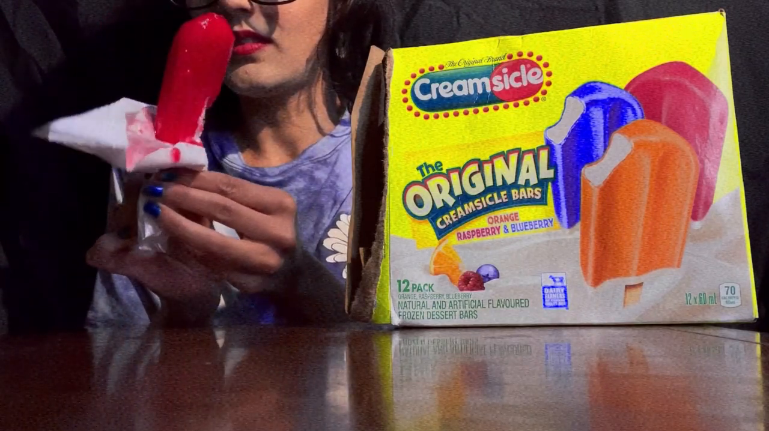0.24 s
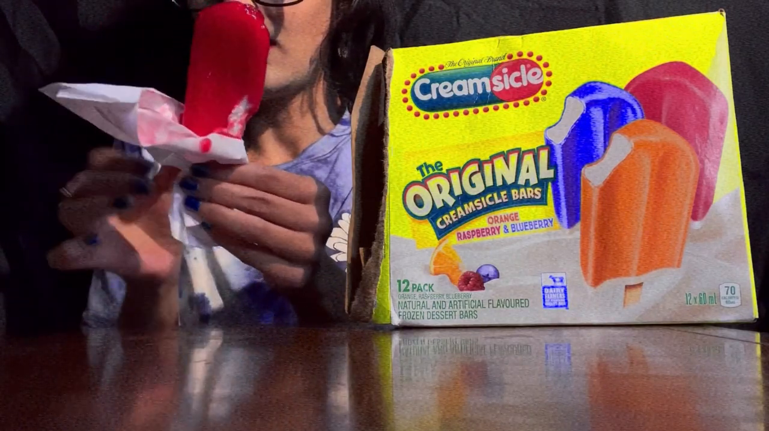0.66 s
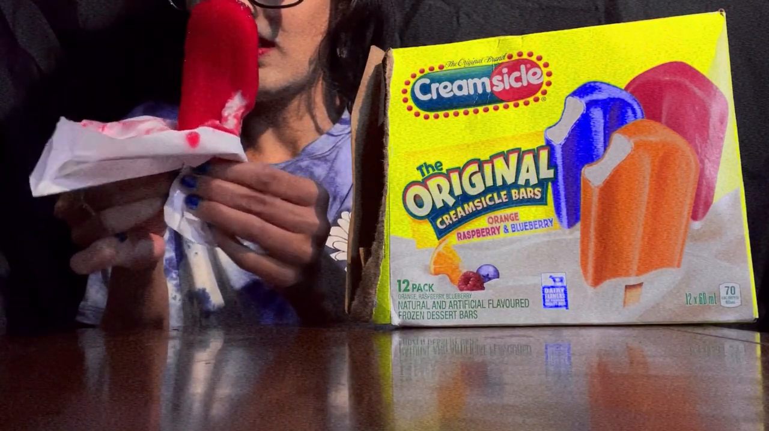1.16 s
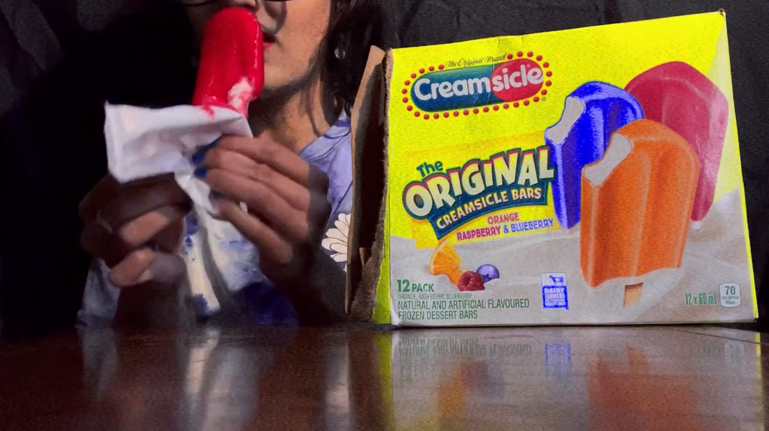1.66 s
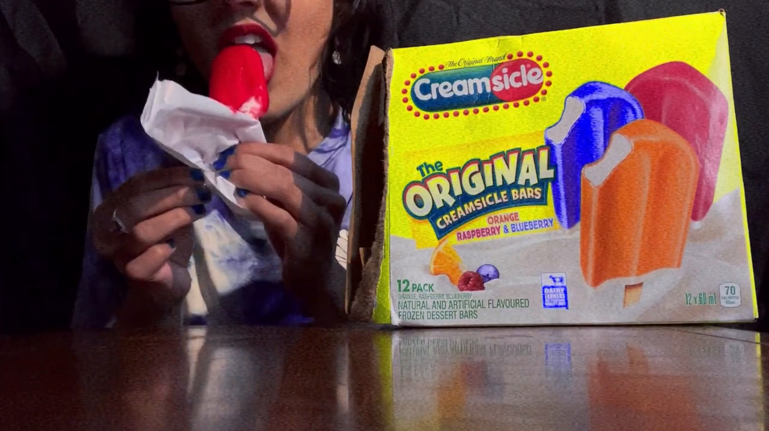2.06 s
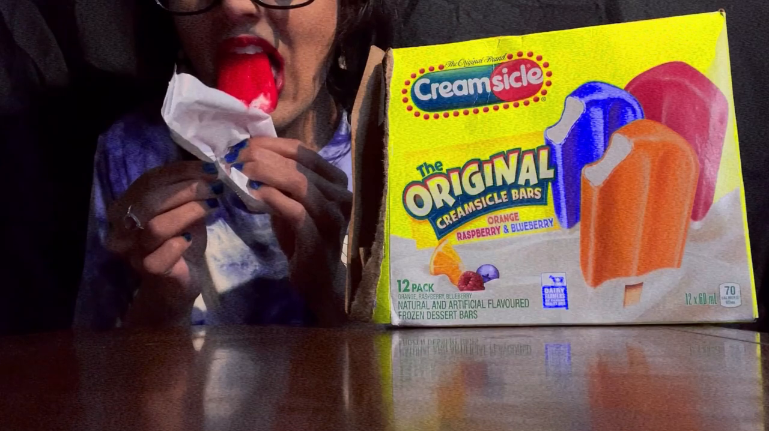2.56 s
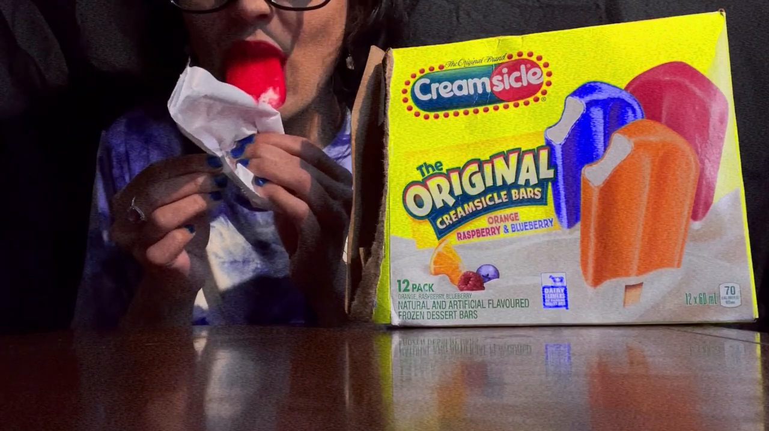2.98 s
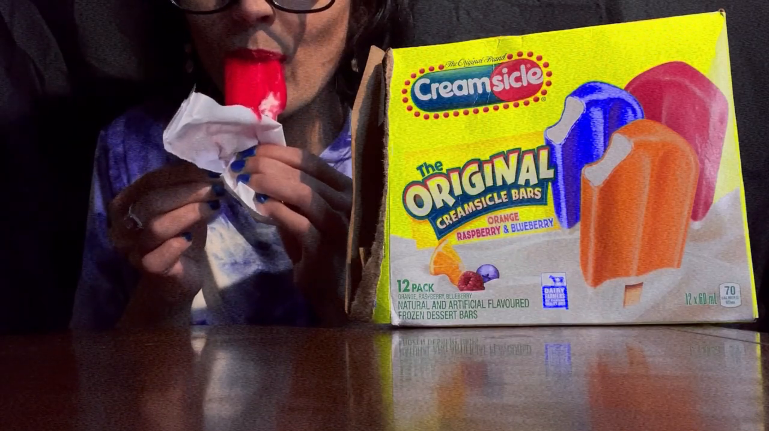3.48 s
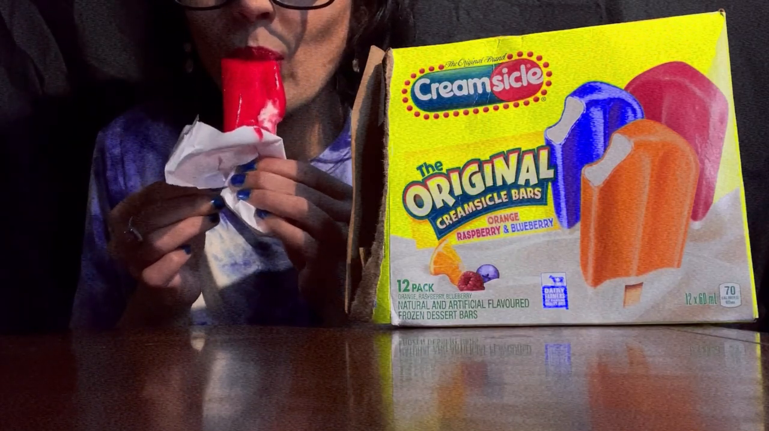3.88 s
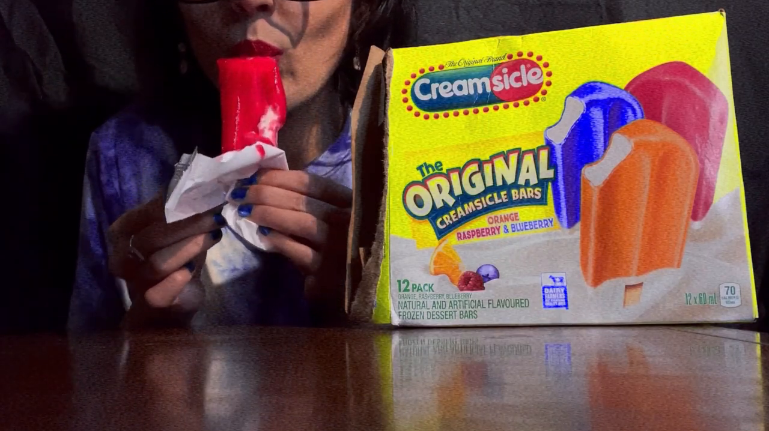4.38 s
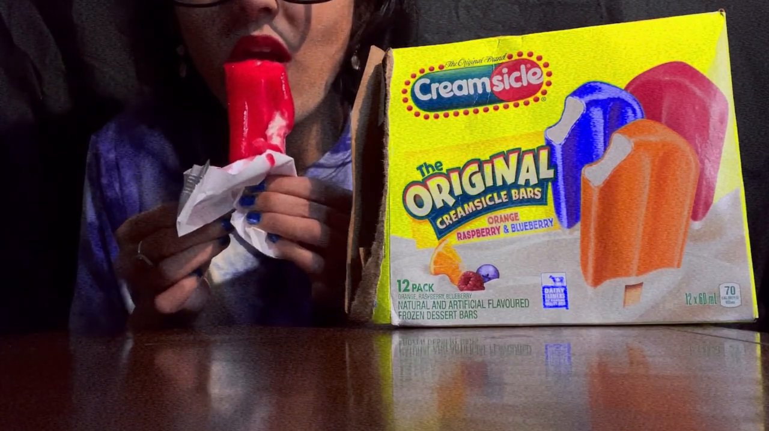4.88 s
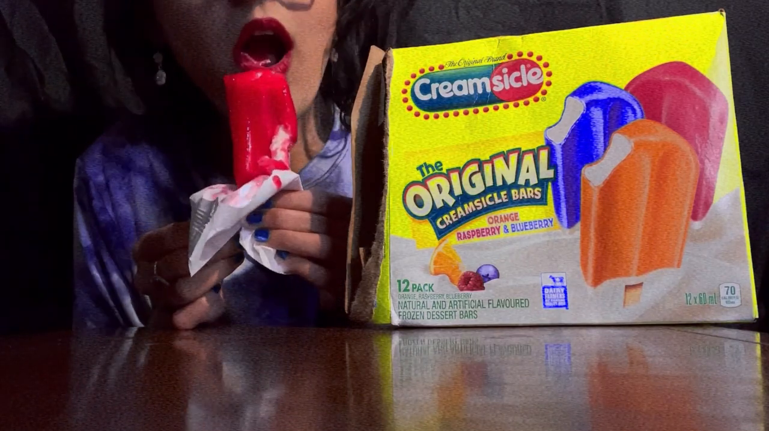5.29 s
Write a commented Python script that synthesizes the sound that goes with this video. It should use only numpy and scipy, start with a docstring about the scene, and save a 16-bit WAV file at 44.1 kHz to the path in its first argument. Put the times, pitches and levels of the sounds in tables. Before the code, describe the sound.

A stiff paper wrapper crinkles and snaps up close, then thins to sparse ticks with a lip smack and wet mouth squeaks.

```python
"""A small quiet room, a two-port microphone close to a stiff paper wrapper on the stick of an ice pop.
A low appliance rumble and faint air noise lie underneath throughout. From the start the paper is bunched:
creases buckle with hard snaps over tiny crackle, and fingers thump the hollow folds. By 2 s this thins to
sparse ticks. Lips smack at 2.6 s and squeak wetly from 3.2 s. After 4.2 s the hands sink towards the
table top, which adds a close echo to the last ticks."""
import sys
import numpy as np
from scipy import signal
from scipy.fft import rfft, irfft, next_fast_len
from scipy.io import wavfile
from scipy.ndimage import map_coordinates

SR = 44100
rng = np.random.default_rng(int(sys.argv[2]) if len(sys.argv) > 2 else 0)


def dump(signal):
    """Clip the signal to [-1, 1] and save it as 16-bit WAV at the path in sys.argv[1]."""
    limited = np.clip(np.atleast_2d(signal).T, -1, 1)
    pcm = np.round(limited * 32767).astype(np.int16)
    wavfile.write(sys.argv[1], SR, pcm)


N = 244314


def amp(db):
    return 10 ** (np.asarray(db) / 20)


def unit(x):
    return x / np.sqrt(np.mean(x ** 2, axis=-1, keepdims=True) + 1e-20)


def along(points, hz):
    """Interpolate (Hz, value) points on a log frequency axis."""
    f, v = np.transpose(points)
    return np.interp(np.log(hz + 1), np.log(f + 1), v)


def wobble(rate):
    """A smooth random curve, rate knots a second."""
    return map_coordinates(rng.standard_normal(int(N * rate / SR) + 4), [np.arange(N) * rate / SR])


def filtered(x, response):
    """Pass x through a complex frequency response."""
    m = next_fast_len(N + SR // 2)
    return irfft(rfft(x, m) * response(np.fft.rfftfreq(m, 1 / SR)), m)[..., :N]


def peak(f, hz, width):
    """A causal resonance of gain 1."""
    return 1j * f * width / (hz * hz - f * f + 1j * f * width)


def bursts(s, db, hz, fizz_db, life, q, broad_db, deep_db, apart, size=1024):
    """Noise bursts on a time scale of life seconds ring a panel or cavity; apart makes the ports differ."""
    t, f = np.arange(size) / SR, np.fft.rfftfreq(size, 1 / SR)
    age = 1.16 * t / life[:, None]
    shared, left, right = rng.standard_normal((len(s), 3, size)).transpose(1, 0, 2)
    # a fold flips over in one jerk near the height of the burst
    jerk = 13 * np.sign(shared[:, :1]) * (np.arange(size) == np.round(2.7 * life * SR)[:, None])
    burst = rfft((shared + jerk + apart * np.array([left, right])) * age ** 4 * np.exp(-age))
    band = lambda shape, band_db: amp(band_db)[..., None] * unit(irfft(burst * shape))
    ring = band(peak(f, hz[:, None], hz[:, None] / q) ** 2, 0)
    core = ring + band(peak(f, 4200, 11000) ** 3, broad_db)
    # large low panels also push the air trapped in the wrapper
    deep = band(peak(f, 850, 760) ** 2, deep_db - 12 * np.log2(hz / 1500))
    fizz = band(peak(f, 10900, 2000) ** 2 + 0.12 * peak(f, 18000, 1800), fizz_db)
    grains = (core + deep + fizz) * (amp(db) / np.abs(core[0]).max(axis=1))[:, None]
    at = np.round(s * SR).astype(int)[:, None] + np.arange(size)
    return np.array([np.bincount(at.ravel(), port.ravel(), N + size)[:N] for port in grains])


# The air all around the microphone. Each row: frequency in Hz, relative spectral level in dB.
AIR_SPECTRUM = [(21, -43), (35, -2.5), (76, 1.5), (346, -11.5), (580, -8), (810, -16.5), (6700, -32.5),
                (8900, -32.5), (11200, -33), (16500, -59.5)]
# How alike that air is at the two ports. Each row: frequency in Hz, correlation from 0 to 1.
AIR_LIKENESS = [(60, 0.25), (400, 0.08), (6000, 0.11)]
# An appliance in the background. Each row: pitch of a hum in Hz, width in Hz, typical level in dB.
APPLIANCE_HUMS = [(68.5, 15, -73), (120.6, 15, -83.5)]


def room_tone():
    """Steady air noise, most alike at the ports in the bass, and two wavering appliance hums."""
    def mid_and_side(f):
        angle = np.arccos(along(AIR_LIKENESS, f)) / 2
        return amp(along(AIR_SPECTRUM, f)) * [np.cos(angle), np.sin(angle)]

    mid, side = filtered(rng.standard_normal((2, N)), mid_and_side)
    hums = sum(amp(db) * unit(filtered(rng.standard_normal(N), lambda f: peak(f, hz, width) ** 2))
               for hz, width, db in APPLIANCE_HUMS)
    return amp(-71.5) * unit(np.array([mid + side, mid - side])) + hums * amp(1.3 * wobble(6.7))


# The hand squeezing the sheet, close up. Each row: time in seconds, relative crackle level in dB.
HAND_PRESSURE = [(0, -57), (.1, -60), (.25, -57), (.34, -54), (.41, -62), (.52, -57), (.66, -60),
                 (.76, -59), (.82, -55), (.88, -58), (.96, -54), (1.07, -62), (1.2, -58), (1.3, -54),
                 (1.5, -58), (1.73, -65.5), (2.07, -82), (2.265, -88), (2.29, -70), (2.36, -80), (2.5, -90),
                 (2.6, -80), (2.97, -83.5), (3.12, -80), (3.23, -74), (3.4, -84), (3.95, -95), (4.28, -79),
                 (4.45, -92), (4.9, -79), (5.05, -91), (5.35, -82), (5.54, -78)]
# Paper rubbing on paper. Each row: frequency in Hz, relative spectral level in dB.
RUB_SPECTRUM = [(300, -14), (1200, -2), (3200, -8.5), (8000, -1), (11000, -8), (13800, -12.5), (15600, -10)]


def crackle(count=3200):
    """Many small creases of very uneven size give way in clumps under the hand, over a papery rub."""
    s, level_db = np.transpose(HAND_PRESSURE)
    when, size, pitch, dullness = rng.random((count, 4)).T
    size_db = -4 * np.log(size + 0.017)
    creases = bursts(when * N / SR, size_db, 1500 * 5 ** pitch, -9 * dullness, np.full(count, .0003),
                     q=1.4, broad_db=-10, deep_db=-7.5, apart=1)
    rub = filtered(rng.standard_normal(N), lambda f: amp(along(RUB_SPECTRUM, f)))
    rub *= amp(3.7 * wobble(60))
    squeeze = amp(np.interp(np.arange(N) / SR, s, level_db))
    clumps = (squeeze + settling()) * amp(2.2 * wobble(18))
    return clumps * (amp(2) * unit(creases) + amp(0.5) * unit(rub))


# The small room behind the close sounds. Each row: frequency in Hz, seconds to die away by 60 dB.
ROOM_DECAY = [(300, 0.41), (1300, 0.2), (3500, 0.18), (9000, 0.11), (16000, 0.035)]


def wall_reverb(x, count=28, build_s=0.0048):
    """The walls' answer builds up quickly and dies soonest in the treble: diffuse, with no steady ring."""
    hz, t, noise = signal.stft(rng.standard_normal((count, 2, SR // 4)), SR, nperseg=256)
    tails = signal.istft(noise * amp(-60 * t / along(ROOM_DECAY, hz)[:, None]), SR, nperseg=256)[1]
    tails *= 1 - np.exp(-(np.arange(tails.shape[-1]) / (build_s * SR)) ** 2)
    wet, step = np.zeros((2, N + SR)), N // count + 1
    for k, tail in enumerate(tails):
        stretch = x[None, k * step:(k + 1) * step]
        answer = signal.fftconvolve(stretch, tail / np.linalg.norm(tail[0]), axes=1)
        wet[:, k * step:][:, :answer.shape[1]] += answer
    return (wet + 0.28 * wet[::-1])[:, :N]  # the walls reach both ports partly alike


# The creases that stand out, right at the microphone. Each row: start in seconds, rough peak in dB,
# panel pitch in Hz, fizz in dB relative to the panel's ring.
CREASE_SNAPS = [(0.0262, -25, 2130, -3), (0.06, -20, 3405, 3.5), (0.0625, -17.5, 3130, -32),
                (0.1184, -13.5, 4860, -42), (0.155, -25.5, 3700, -19), (0.175, -16, 3270, -5),
                (0.205, -13.5, 2730, -3.5), (0.2151, -18.5, 2800, -32), (0.222, -23.5, 2580, -17),
                (0.2311, -17, 3120, -7), (0.2484, -19, 4870, -26), (0.2801, -18.5, 1520, -7.5),
                (0.2975, -18, 1750, -26), (0.311, -15, 2950, 6.5), (0.3254, -33, 2300, -36),
                (0.4369, -33.5, 4180, -18), (0.448, -36, 3500, -15), (0.4688, -18, 7140, -41),
                (0.4923, -30.5, 4100, -16), (0.5265, -18.5, 5400, -29), (0.5547, -29, 2004, -16),
                (0.567, -31.5, 5260, -8), (0.581, -20, 1840, -33), (0.5885, -32.5, 3360, -17),
                (0.643, -38, 1980, -7), (0.7031, -32.5, 3540, 0), (0.7144, -27.5, 2370, -16),
                (0.7345, -38, 5700, -17), (0.776, -32.5, 2260, -14), (0.791, -29, 4180, -19),
                (0.8171, -30, 2950, -7), (0.8277, -19, 2058, -11), (0.8903, -38, 2620, -15),
                (0.917, -27, 2640, -19), (0.927, -29.5, 3330, 1), (0.9435, -22.5, 3050, -22),
                (0.9527, -15.5, 2850, -31), (0.9568, -22, 1790, -27), (0.9646, -23, 2160, -25),
                (0.968, -23.5, 3550, -32.5), (1.0021, -35, 1410, 5), (1.051, -43.5, 6000, 11),
                (1.061, -44.5, 5560, 22), (1.0887, -39, 5970, 13.5), (1.1345, -14, 5770, -14),
                (1.142, -10, 2770, -34.5), (1.1515, -36, 2260, -20), (1.1712, -28.5, 2100, -20),
                (1.1645, -27.5, 6330, -9), (1.1805, -26.5, 6100, -12), (1.1894, -27, 6260, -17),
                (1.198, -24, 5600, -14), (1.221, -33, 2820, 8), (1.2538, -31, 2530, -29),
                (1.2642, -34, 3030, -19), (1.2712, -22.5, 3220, 3), (1.2818, -29.5, 4520, -17),
                (1.3226, -31.5, 2480, -16), (1.3327, -18.5, 5870, -32), (1.3408, -29, 4000, -26),
                (1.392, -26, 2010, -19), (1.432, -25.5, 5320, -12), (1.467, -22, 2160, -22),
                (1.543, -35, 3030, -12), (1.6244, -47.5, 5240, 12), (1.6801, -34.5, 4700, 0.5),
                (1.747, -36, 4120, -15), (1.76, -13.5, 5470, -25), (1.8068, -43, 3930, -18),
                (1.818, -33.5, 3400, -16), (1.8362, -27.5, 2605, -30), (1.925, -31.5, 4314, -21),
                (1.98, -42.5, 5630, -22), (2.0276, -52, 3770, 0.5), (2.0815, -43, 5550, -14.5),
                (2.1426, -46.5, 5770, -12), (2.1495, -50.5, 5800, -14), (2.2831, -29, 2853, 0.5),
                (2.389, -43.5, 1750, -27.5), (2.532, -45.5, 3090, -30), (2.569, -43.5, 5300, -11),
                (2.605, -44.5, 2500, -12), (2.6161, -46, 3390, -29.5), (2.9878, -53.5, 2540, -15.5),
                (3.0306, -31.5, 4320, 1), (3.0478, -37, 5700, -32), (3.072, -47, 4200, -17),
                (3.0827, -46, 3460, -15), (3.1454, -36.5, 3510, -22), (3.1635, -39.5, 5600, -32),
                (3.207, -43.5, 2800, -5), (3.2581, -45, 3450, -15), (3.294, -42, 3540, -35),
                (3.336, -42, 5140, -18), (3.352, -52, 3530, -12), (3.4453, -59, 2500, 12.5),
                (3.4574, -45.5, 5600, -8), (3.4677, -41, 4540, -25), (3.4798, -33, 4190, 2.5),
                (3.5044, -35.5, 4430, 2), (3.566, -50.5, 2060, -12), (3.6133, -37, 3990, 2),
                (3.6875, -35.5, 4200, 2.5), (3.752, -51, 5000, 6.5), (3.7887, -40.5, 4420, 6),
                (3.8098, -44.5, 4120, -10.5), (3.8445, -49.5, 3460, 1), (3.9386, -53, 6060, -5.5),
                (4.051, -47, 5520, -33.5), (4.1159, -42, 4900, -0.5), (4.1583, -51, 3880, 4),
                (4.191, -33, 5930, -23), (4.195, -41.5, 4200, 10), (4.239, -46.5, 5200, -24),
                (4.2602, -42, 3900, 8), (4.2737, -38.5, 4200, -16), (4.2838, -45, 4500, -12),
                (4.293, -47, 2180, -4), (4.2994, -49, 4200, -15), (4.311, -49, 5290, -13),
                (4.3245, -53, 4720, -13.5), (4.4325, -44, 5400, -13.5), (4.489, -41, 4690, 7),
                (4.5107, -50, 4420, -7.5), (4.5906, -46.5, 2040, -23.5), (4.63, -39.5, 5170, -1.5),
                (4.6847, -48.5, 5900, -23), (4.7069, -42, 4560, 2), (4.7262, -46, 2040, -16),
                (4.735, -39, 5370, 7.5), (4.765, -44.5, 5140, 0), (4.7868, -45, 5170, -10),
                (4.8434, -49, 4470, -19), (4.8497, -51.5, 3780, -17), (4.8614, -52, 4900, -14),
                (4.8727, -48.5, 3000, -5), (4.889, -45.5, 5040, -12), (4.8934, -49, 4800, -13),
                (4.899, -49.5, 5140, -14), (4.9036, -46, 4700, 9.5), (4.9107, -39, 5270, -17),
                (4.9197, -51, 4920, 0), (4.926, -49, 2460, 2), (4.938, -47, 4880, -31),
                (4.9771, -40.5, 5020, -3), (5.148, -47, 4200, -9), (5.164, -40.5, 4480, 3.5),
                (5.1744, -45, 4840, -12), (5.1833, -42.5, 5550, -10), (5.244, -54, 3520, -12.5),
                (5.2579, -41, 4970, -28), (5.3088, -48, 5700, 10), (5.3355, -52.5, 2700, -9),
                (5.351, -46, 5700, 6), (5.3764, -48, 6270, -12), (5.3894, -32, 5650, 3.5),
                (5.42, -48, 5300, -10), (5.467, -42, 2030, -39), (5.4732, -43, 6300, -16),
                (5.5344, -49, 4500, -14)]


def snaps(rows=CREASE_SNAPS):
    """A crease buckles: slipping fibres ring its panel and fizz. Low panels take longer to flip."""
    s, db, hz, fizz_db = np.transpose(rows)
    life = 0.00038 * (3000 / hz) ** 0.57
    return bursts(s, db, hz, fizz_db, life, q=1.24, broad_db=-4, deep_db=-15, apart=1)


def settling(share_db=-37, t60_s=0.1):
    """The strength of the crackle that follows each snap as the sheet settles."""
    s, db = np.transpose(CREASE_SNAPS)[:2]
    kicks = np.bincount(np.round(s * SR).astype(int), amp(db + share_db), N)
    return filtered(kicks, lambda f: SR / (np.log(1000) / t60_s + 2j * np.pi * f))


# Fingers on the wrapper, close up. Each row: start in seconds, peak in dB, pitch in Hz.
FINGER_THUMPS = [(0.0959, -29, 1100), (0.312, -21.5, 890), (0.331, -44.5, 306), (0.375, -40.5, 520),
                 (0.4047, -38.5, 930), (0.499, -32, 1020), (0.553, -33, 1114), (0.581, -25, 1090),
                 (0.777, -41.5, 674), (0.887, -42.5, 680), (0.95, -35, 1060), (0.974, -43, 556),
                 (1.102, -48, 1410), (1.121, -43.5, 1090), (1.142, -26, 1622), (1.273, -38.5, 639),
                 (1.29, -43.5, 496), (1.335, -41, 730), (1.396, -45.5, 472), (3.222, -55, 700)]


def thumps():
    """Fingers push the hollow folded sheet: soft dull blows of a few cycles."""
    s, db, hz = np.transpose(FINGER_THUMPS)
    return bursts(s, db, hz, fizz_db=-40, life=.3 / hz, q=0.98, broad_db=-32.5, deep_db=-39.5, apart=0.86)


# Runs of ticks, just as near. Each row: start in seconds, length in seconds, typical peak in dB.
ROLLING_FOLDS = [(0.495, 0.07, -35.5), (0.844, 0.031, -31.5), (1.528, 0.053, -46.5), (2.83, 0.091, -59),
                 (5.478, 0.037, -53)]


def fold_ticks(ticks_per_s=110, centre_hz=4200, spread_oct=0.49):
    """A fold rolls under a finger and lets go an uneven run of ticks, returned as rows for snaps()."""
    rows = []
    for start, length, db in ROLLING_FOLDS:
        gap, size, pitch, fizz = rng.standard_normal((24, 4)).T
        s = start + (np.cumsum(np.exp(0.66 * gap)) - 1) / ticks_per_s
        ticks = np.transpose([s, db + 2.5 * size, centre_hz * 2 ** (spread_oct * pitch), -6 + 7 * fizz])
        rows.append(ticks[s < start + length])
    return np.concatenate(rows)


def lip_smack(start_s=2.6335, mouth_hz=2610, attack_s=0.0046, fade_db_per_s=55):
    """The lips pop the mouth cavity, then a faint wet hiss fades in the same resonance."""
    s, db, hz, life = np.transpose([(start_s, -26.5, mouth_hz, .0004)])
    pop = bursts(s, db, hz, fizz_db=-28, life=life, q=2.2, broad_db=-10, deep_db=-21.5, apart=0.37)
    suction = rng.standard_normal(N) * amp(2.3 * wobble(28))
    hiss = unit(filtered(suction, lambda f: peak(f, mouth_hz, 820) ** 2))
    t = np.maximum(np.arange(N) / SR - start_s, 0)
    return pop + amp(-75.5 - fade_db_per_s * t) * (1 - np.exp(-t / attack_s)) * hiss


# Lips near the microphone. Each row: start in seconds, peak in dB, pitch in Hz, time scale in seconds.
LIP_SQUEAKS = [(3.221, -37, 2880, .0008), (4.83, -46, 3720, 0.0011), (4.907, -49.5, 1700, .002),
               (5.498, -45, 4680, .0015), (5.5, -51, 1270, 0.0042)]


def lip_squeaks():
    """Wet lips part with a short squeak: a longer burst rings a narrow resonance."""
    s, db, hz, life = np.transpose(LIP_SQUEAKS)
    return bursts(s, db, hz, fizz_db=-40, life=life, q=3.1, broad_db=-1, deep_db=-43.5, apart=0.421)


def table_echo(x, start_s=4.24, lowering_s=1.44, delay_s=0.000399):
    """The table top sends back a close echo that grows as the hands sink."""
    lowered = np.clip((np.arange(N) / SR - start_s) / lowering_s, 0, 1)
    return 0.2 * lowered * filtered(x, lambda f: np.exp(-2j * np.pi * f * delay_s))


def scene():
    """Paper and lips up close; table top, walls and room tone behind them."""
    creases = np.concatenate([CREASE_SNAPS, fold_ticks()])
    close = snaps(creases) + crackle() + thumps() + lip_smack() + lip_squeaks()
    close += table_echo(close)
    return close + amp(-17) * wall_reverb(close.mean(axis=0)) + room_tone()


# The microphone's two ports. Each row: frequency in Hz, phase by which the left leads in radians.
PORT_PHASE = [(100, -.1), (1460, 0), (4390, .6), (6030, .7), (8850, 3.14), (11500, 6.28), (14300, 9.42),
              (16100, 11.1)]


def record(dry, top_hz=16700):
    """The ports shift the treble against each other, dip near 12 kHz and fade out to the band limit."""
    phase = lambda f: np.exp(.5j * np.outer([1, -1], along(PORT_PHASE, f)))
    dip = lambda f: 1 - .5 * peak(f, 11850, 3600)
    rolloff = lambda f: (f < top_hz) / (1 + (f / 16000) ** 40)
    return filtered(dry, lambda f: phase(f) * dip(f) * rolloff(f))


dry = scene()
out = record(dry)
dump(out)
```